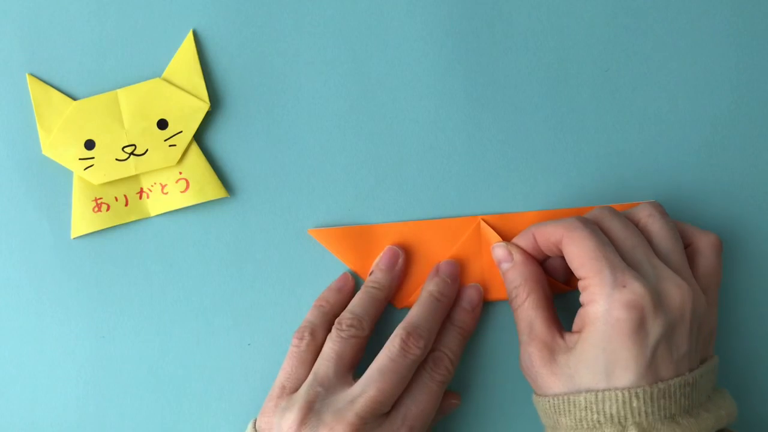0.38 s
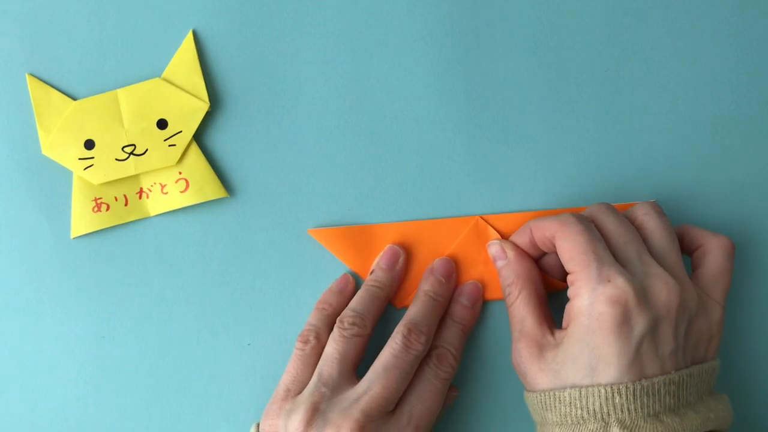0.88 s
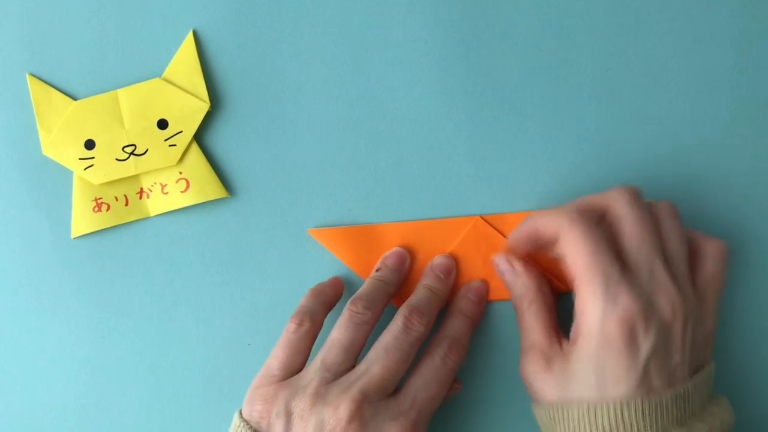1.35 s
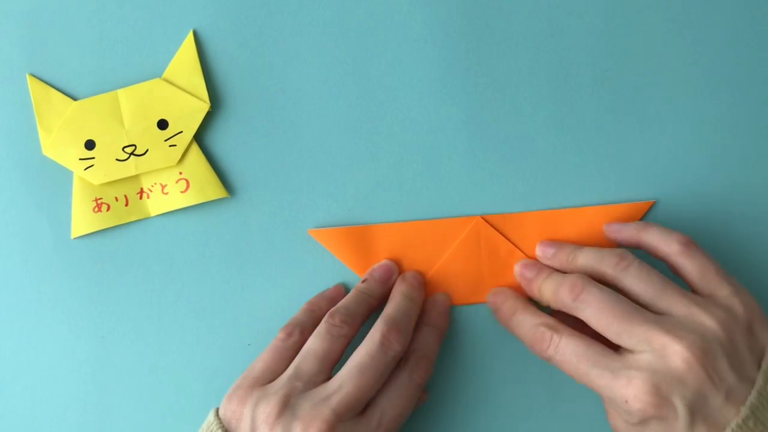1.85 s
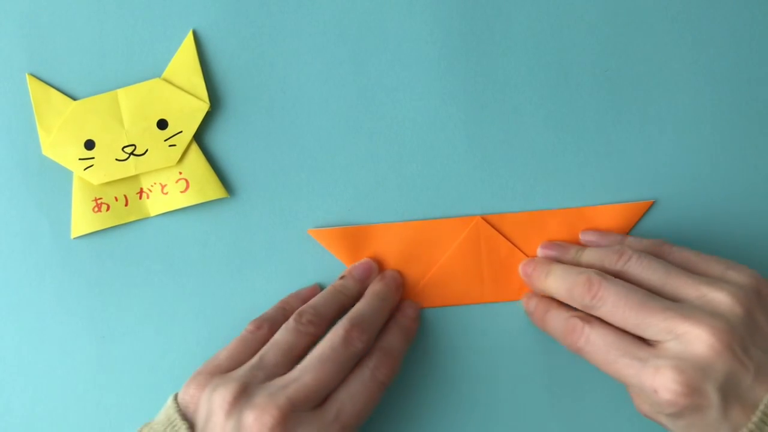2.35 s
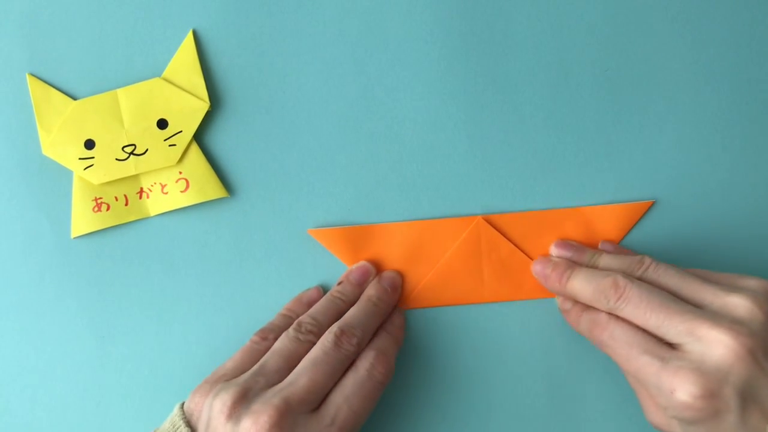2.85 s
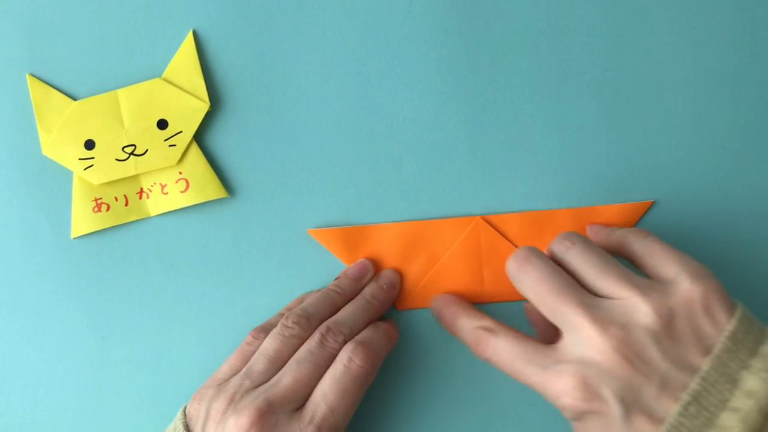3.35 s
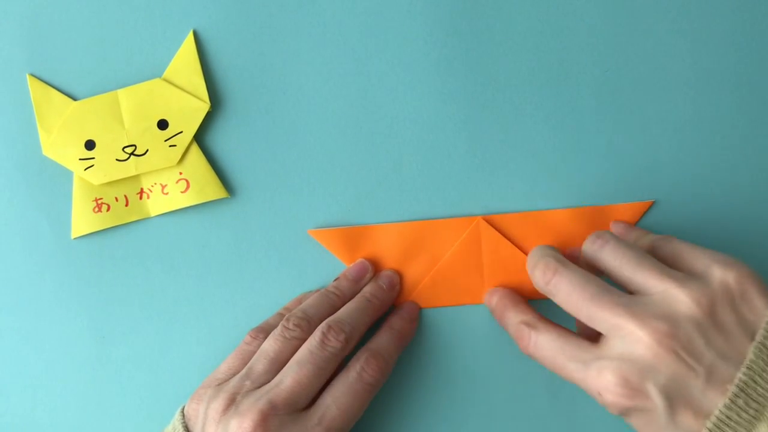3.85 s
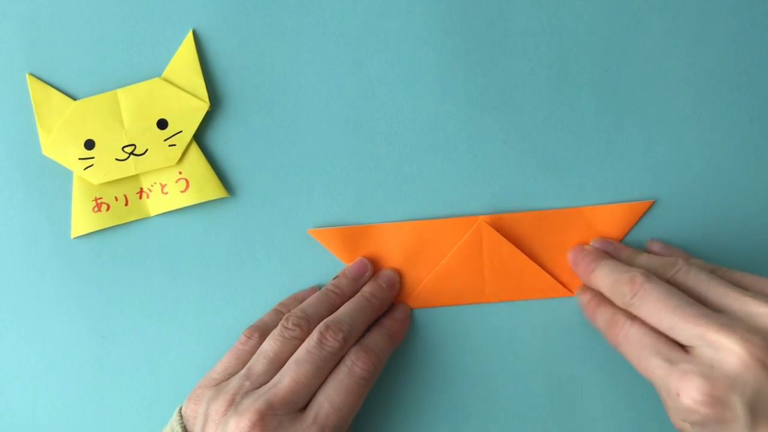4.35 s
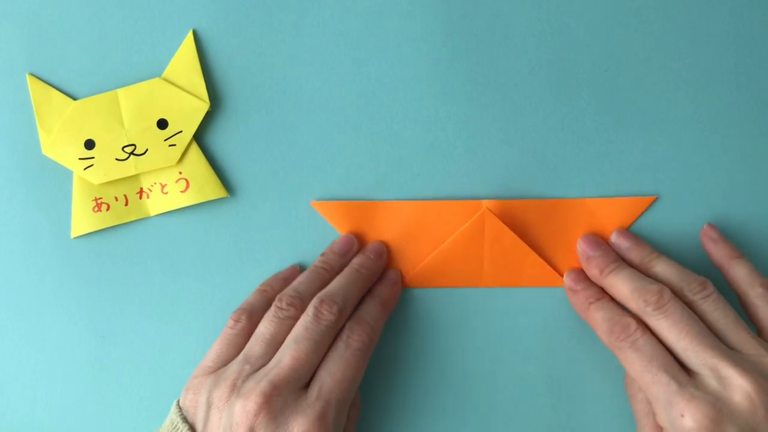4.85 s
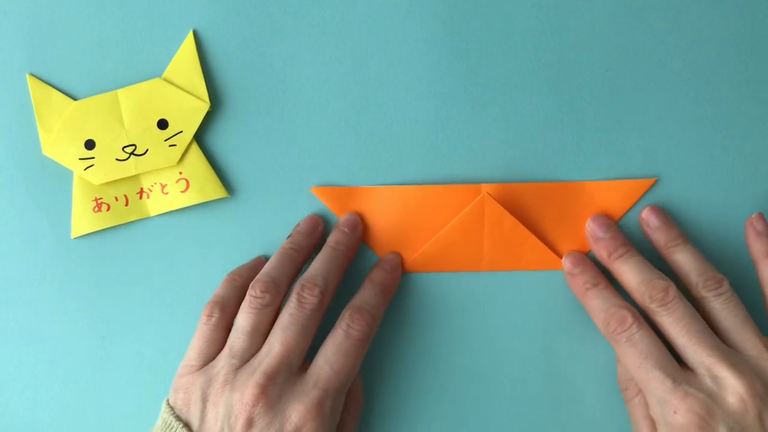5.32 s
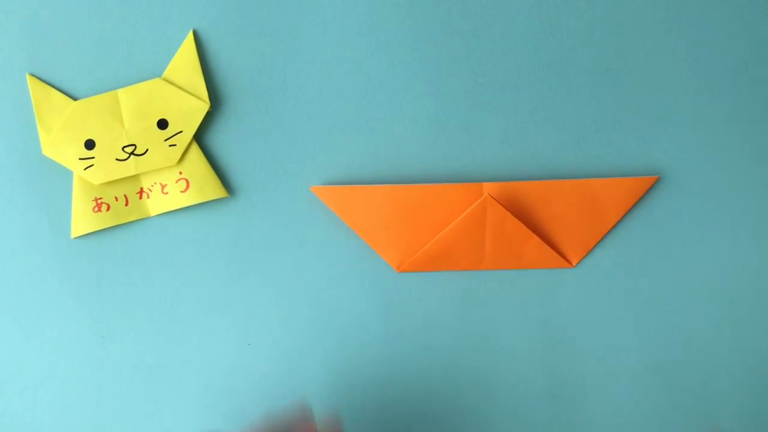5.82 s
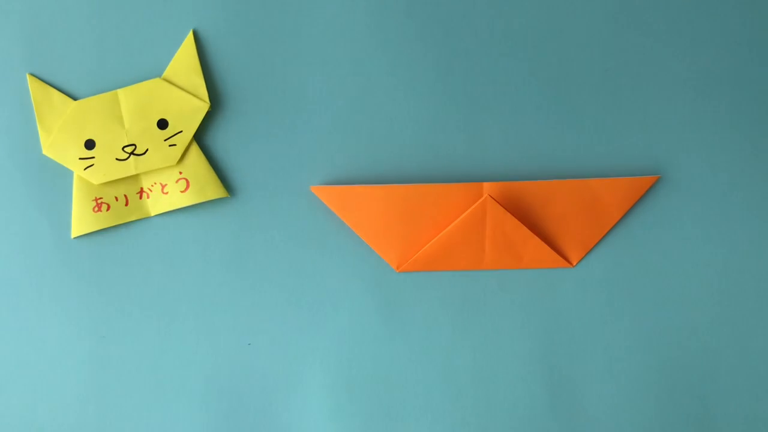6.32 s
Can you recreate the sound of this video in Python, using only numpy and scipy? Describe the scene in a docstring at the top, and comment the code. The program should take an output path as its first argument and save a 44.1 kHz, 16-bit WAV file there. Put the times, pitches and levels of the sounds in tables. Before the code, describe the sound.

A close, mono sound of hands folding a small sheet of paper on a light, slightly hollow tabletop in a quiet room with faint, low-weighted steady noise. From 0 to 0.8 s there are only soft rustles and tiny ticks. Around 0.85 to 1.2 s crisp snaps cluster, the strongest near 1.04 s, with small fingertip taps. From 1.3 to 2 s smooth hissing strokes begin, with a soft knock near 1.6 s. Between 2.2 and 3 s low rubbing and dull taps mix with small ticks; a bright snap comes at 3.04 s. A short sharp scrape sounds at 3.67 s, followed by firmer drags and hisses until 4.3 s. The loudest dry snap hits at 4.47 s. Light airy strokes continue to about 5.4 s, a small click follows at 5.6 s, then faint, nearly still room noise until about 6.7 s.

```python
"""Folding paper on a hollow tabletop

Fingers fold and crease a small sheet of paper on a light tabletop in a quiet room with a steady noise.
Skin slides over the paper by dense fine slips, a smooth hiss; drags, shifting weight and fingertip
landings excite the table's modes. Coarser slips rustle in the resonances of the folded pocket,
and sharp ticks are single snaps with a short crackle, a broad ring and a grainy scatter."""
import sys
import numpy as np
from scipy import signal
from scipy.fft import rfft, irfft
from scipy.io import wavfile
from scipy.ndimage import uniform_filter1d

SR = 44100
rng = np.random.default_rng(int(sys.argv[2]) if len(sys.argv) > 2 else 0)


def voltage_ratio(level):
    """Linear amplitude factor for a level in decibels (scalar or array-like)."""
    return 10 ** (np.asarray(level, float) / 20)


def dump(signal):
    """Clip the signal to [-1, 1] and save it as 16-bit WAV at the path in sys.argv[1]."""
    limited = np.clip(np.atleast_2d(signal).T, -1, 1)
    pcm = np.round(limited * 32767).astype(np.int16)
    wavfile.write(sys.argv[1], SR, pcm)


N = 295178   # length in samples

# Steady room noise; the last row is no property of the room but a band limit on steady sounds,
# which end steeply near 15.8 kHz. Each row: frequency in Hz, relative density in dB per Hz.
ROOM_NOISE_SPECTRUM = [(15, -45), (30, -2.5), (45, 2.5), (90, -3), (160, -9.5), (300, -15.5), (620, -18.5),
                       (1800, -24), (3300, -25.5), (8000, -28), (12300, -30), (15500, -31.5), (15900, -53)]
ROOM_DB = -65
# Modes of the tabletop. Each row: frequency in Hz, width in Hz, gain in dB.
TABLE_MODES = [(63.1, 34.6, -3.5), (125.5, 17.2, 2.5), (283, 33, -5.5), (419.3, 91, -12), (674, 101, -12),
               (1170, 242, -13.5), (1607, 63, -13.5), (1750, 160, -26)]
# Hands shifting their weight on the tabletop. Each row: time in seconds, level in dB before a slow waver.
WEIGHT_SHIFTS = [(0.0, -70), (0.165, -62.5), (0.474, -66), (0.978, -67.5), (1.217, -62), (1.5, -76),
                 (1.7, -56), (2.13, -68), (2.34, -54.5), (2.56, -59), (2.66, -68), (2.75, -58),
                 (3.233, -62.5), (3.617, -64), (3.722, -63), (4.305, -58.5), (4.739, -67.5), (5.258, -63),
                 (5.368, -80), (6.116, -69), (6.69, -67.5)]
# The sheet pressed and dragged over the tabletop.
# Each row: peak time in seconds, level in dB, rise in seconds, fall in seconds.
DRAGS = [(.25, -74.5, 1, 0.35), (1.232, -69, 0.22, 0.3), (1.7, -68, 0.25, 0.19),
         (1.816, -69.5, 0.079, 0.14), (1.99, -66.5, .18, 0.1), (2.2, -58.5, 0.016, 0.83),
         (2.39, -56, 0.22, 0.19), (2.56, -63, 0.06, .07), (2.715, -65, .03, 0.088),
         (2.84, -61.5, 0.05, 0.038), (2.94, -71, .05, 0.13), (3.17, -69.5, 0.7, 0.32),
         (3.52, -60, 0.5, 0.12), (3.69, -62, 0.027, 0.37), (3.81, -54.5, 0.12, 0.16),
         (4.17, -57.5, 0.64, 0.31), (4.39, -65.5, .25, 0.056), (4.64, -66.5, .4, 0.45),
         (4.85, -67.5, .3, 0.06), (5.288, -69.5, .12, 0.13), (6.05, -72.5, 0.18, .7)]
DRAG_REST_DB = -84.5
# Fingertips landing on the table. Each row: start in seconds, peak in dB, decay time of the push in ms.
LANDINGS = [(0.304, -58, 0.55), (0.825, -43.5, 0.62), (0.858, -43.5, 0.79), (0.928, -52.5, 0.63),
            (1.021, -49, 0.18), (1.04, -48, 0.64), (1.078, -48.5, 0.7), (1.166, -47, 0.5),
            (1.197, -53, 0.38), (1.424, -53, 0.96), (1.571, -36.5, 0.16), (1.646, -43.5, 0.93),
            (1.74, -45, 0.54), (1.96, -46, 0.87), (2.037, -43.5, 1.0), (2.19, -46, 0.34), (2.25, -43, 0.13),
            (2.51, -44.5, 0.41), (2.534, -40.5, 0.36), (2.556, -41, 0.23), (2.588, -42.5, 0.16),
            (2.695, -44.5, 0.42), (2.717, -40.5, 0.83), (2.802, -47, 0.44), (2.829, -40.5, 0.7),
            (2.92, -46, 0.67), (3.038, -42, 0.27), (3.187, -55, 0.56), (3.512, -58, 0.46),
            (4.114, -46, 0.38), (4.349, -43.5, 0.11), (4.468, -50.5, 0.43), (5.052, -52.5, 0.92),
            (5.218, -55, 0.47)]
# Finger strokes over the paper. Each row: peak time in seconds, hiss level in dB before its tilt and
# waver, rise in seconds, fall in seconds.
SLIDES = [(.06, -62.5, 0.6, 0.11), (.544, -72, 0.034, 0.029), (1.197, -72.5, .08, 0.14),
          (1.345, -60, 0.057, 0.054), (1.44, -59.5, .04, .1), (1.52, -55.5, 0.14, 0.44),
          (1.785, -58, 0.18, 0.088), (1.99, -57, 0.1, .07), (2.335, -60, 0.22, 0.21),
          (2.559, -71, 0.038, 0.053), (2.715, -72, 0.026, 0.071), (2.84, -58.5, 0.045, 0.03),
          (2.97, -96, .1, 0.041), (3.098, -63, 0.063, 0.14), (3.233, -58, 0.095, 0.05),
          (3.43, -61, 0.6, 0.21), (3.532, -55.5, 0.037, 0.03), (3.666, -43.5, 0.0047, 0.027),
          (3.79, -55, 0.15, 0.13), (3.995, -68, .03, 0.11), (4.106, -55.5, 0.12, 0.054),
          (4.205, -62.5, .2, 0.039), (4.36, -70.5, 0.038, 0.054), (4.395, -69, .05, 0.033),
          (4.5, -61.5, 0.053, 0.14), (4.62, -62, 0.12, 0.59), (4.84, -64.5, .5, 0.27),
          (5.045, -64, .03, .05), (5.085, -61, 0.036, 0.033), (5.135, -58.5, 0.02, 0.11),
          (5.255, -59, 0.071, 0.11), (5.378, -70, .07, 0.034), (5.567, -71, .04, 0.038),
          (5.662, -73, 0.04, 0.09), (5.737, -69.5, 0.044, 0.079), (6.136, -72.5, 0.26, 0.64)]
SLIDE_REST_DB = -87   # fingers resting on the sheet
# Hiss of skin on paper; the last row is no property of the skin but the same band limit on steady
# sounds. Each row: frequency in Hz, relative density in dB per Hz before the tilt.
HISS_SPECTRUM = [(900, -6), (1500, -4), (2300, -11.5), (4000, -4.5), (6000, -4.5), (9000, -4.5),
                 (12000, -6.5), (15500, -13), (15900, -38.5)]
# The hiss is duller the harder the finger bears down.
TILT_DB_PER_OCT, DULLING_PER_DB = -1.5, 0.08
# Paper layers rubbing in the fold.
# Each row: peak time in seconds, level in dB, rise in seconds, fall in seconds.
RUSTLES = [(.02, -65.5, 0.12, 0.18), (.215, -62, 0.038, 0.016), (.285, -57.5, 0.048, 0.028),
           (.424, -59, 0.021, 0.018), (.539, -62, 0.069, 0.086), (.644, -67.5, 0.022, 0.014),
           (.698, -67.5, 0.019, 0.013), (.828, -67, .03, 0.018), (1.197, -54.5, 0.017, 0.023),
           (1.25, -61, 0.092, 0.18), (1.457, -52.5, 0.027, 0.0085), (1.535, -70, 0.043, 0.63),
           (1.72, -66, 0.16, 0.18), (1.805, -66, 0.082, 0.05), (1.985, -84, .3, 0.17),
           (2.38, -89, 0.18, 0.22), (2.559, -66, 0.056, 0.037), (2.734, -81, 0.054, 0.049),
           (2.855, -67, .07, 0.029), (2.945, -69, 0.034, 0.041), (3.1, -74, 0.062, .5),
           (3.45, -65.5, 0.18, 0.17), (3.76, -57.5, 0.1, 0.093), (4.11, -59.5, 0.12, .1),
           (4.21, -61.5, .15, .035), (4.305, -65, 0.049, .033), (4.39, -65.5, 0.046, .03),
           (4.53, -72, .09, 1.7), (5.083, -66, 0.1, 0.055), (5.26, -64.5, 0.082, 0.14),
           (5.37, -71, 0.13, 0.047), (6.126, -78, 0.12, 0.17)]
RUSTLE_REST_DB = -101.5
# Air and paper of the folded pocket. Each row: frequency in Hz, width in Hz, gain in dB.
POCKET_MODES = [(1180, 150, -11), (1670, 140, 0), (2290, 170, 1), (2850, 250, -9), (3700, 400, -12)]
# Paper ticks. Each row: time in seconds, peak in dB before the scatter is added, ring frequency in Hz,
# early treble rms in dB relative to the ring's peak, crackle in dB relative to the snap.
TICKS = [(0.19, -40, 1640, -9, -23), (0.2563, -48, 2230, -20, -19), (0.303, -47, 2260, -16, -16),
         (0.4134, -57, 2300, -16, -4), (0.466, -48, 1600, -17, -16), (0.5474, -48, 4970, -14, -13.5),
         (0.6935, -52.5, 2360, -11, -20), (0.8125, -39.5, 2400, -34, -35), (0.8586, -19.5, 5840, -53, -26),
         (0.881, -47, 3000, -29, -27), (1.0212, -35, 2410, -18, -15), (1.0368, -14, 2800, -28, -27),
         (1.0798, -31, 1750, -8, -15.5), (1.1352, -31, 3370, -1, -13), (1.164, -35, 2200, -13.5, -13),
         (1.1942, -47, 2260, -15, -9), (1.3256, -35.5, 3670, -17, -13.5), (1.4282, -40.5, 1630, -8, -23),
         (1.5701, -24, 4660, -22, -11), (1.6436, -37, 1750, -17.5, -19.5), (1.798, -33.5, 1490, -16, -20),
         (2.192, -40.5, 1160, -13, -19), (2.2458, -40.5, 1170, -15, -13.5),
         (2.292, -36, 3600, -14.5, -15.5), (2.4325, -22.5, 2800, -6, -22), (2.468, -47.5, 883, -14, -16),
         (2.5121, -43.5, 1060, -16, -15), (2.5316, -32.5, 1230, -18.5, -16), (2.558, -47, 1160, -8, -17),
         (2.589, -30.5, 1590, -15.5, -22), (2.696, -41, 1180, -15, -3), (2.719, -54, 1170, -24, -2),
         (2.8017, -42.5, 1170, -20, -19), (2.8293, -31, 1750, -15.5, -20), (2.9176, -37.5, 1750, -10.5, -4),
         (2.9873, -43, 1350, -32, -24), (3.039, -15, 2560, -2, -9), (3.1885, -41.5, 5140, -1, -12),
         (3.3029, -42.5, 980, -25, -25), (3.5209, -38.5, 1690, 1, -17), (3.6651, -29, 3650, -12, -4),
         (3.932, -23, 7100, -43, -16), (3.9863, -45, 965, -15, -14), (4.1905, -42.5, 1760, -20, -1),
         (4.2204, -45, 1770, -20, -19), (4.3192, -38.5, 1160, -21, -18.5), (4.3498, -38, 1180, -19, -21.5),
         (4.4546, -24.5, 3940, -9, -30), (4.4687, -3.5, 3150, -18.5, -21), (5.1218, -49, 4330, -8, -21),
         (5.1544, -48.5, 1660, -25, -3), (5.1913, -35, 835, -15, -19), (5.217, -40.5, 2200, -20, -22),
         (5.3574, -50.5, 1470, -18, -26), (5.5907, -30.5, 4890, -28, -17), (6.123, -48, 6000, -13, -19.5)]
# Scatter gain relative to the tick's peak; a drier tick leaves less.
TICK_TAIL_DB, TAIL_PER_CRACKLE_DB = -11, 0.27
# Rise and fall of a stroke are the times to lose 20 dB, 5 ms at least.
STROKE_ROUNDNESS = 1.22   # 1 pointed, 2 bell-shaped
# Dips where a reflection off the tabletop cancels the direct sound.
# Each row: frequency in Hz, width in Hz, depth from 0 to 1.
REFLECTION_DIPS = [(4890, 900, 0.4), (7730, 1480, 0.39), (10450, 1700, 0.44)]
CUTOFF_HZ = 17000   # attenuation reaches 60 dB here


def rms_one(x):
    """Normalisation: a signal divided by its root mean square has unit rms."""
    return x / np.sqrt(np.mean(x ** 2) + 1e-20)


def in_time(rows):
    """Linear interpolation: the columns of a curve table at every sample."""
    s, *columns = np.transpose(rows)
    return [np.interp(np.arange(N) / SR, s, c) for c in columns]


def strokes_db(rows, rest_db):
    """Incoherent addition: the powers of overlapping strokes add to a resting power; level in dB."""
    t = np.arange(0, N + 44, 44) / SR
    power = voltage_ratio(2 * rest_db)
    for s, peak_db, rise, fall in rows:
        away = np.where(t < s, (s - t) / max(rise, .005), (t - s) / max(fall, .005))
        loss_db = 20 * np.minimum(away, 9) ** STROKE_ROUNDNESS
        power = power + voltage_ratio(2 * (peak_db - loss_db))
    return np.interp(np.arange(N) / SR, t, 10 * np.log10(power))


def coloured(x, spectrum):
    """Spectral shaping: a steady noise is weighted by a (Hz, dB per Hz) spectrum; rms 1."""
    hz, level_db = np.transpose(spectrum)
    bins = np.maximum(np.arange(N // 2 + 1) * SR / N, 1)
    gain = voltage_ratio(np.interp(np.log(bins), np.log(hz), level_db))
    return rms_one(irfft(rfft(x) * gain, N))


def band(x, low_hz, high_hz):
    """Band-pass filtering by a Butterworth design of order 2."""
    edges = [low_hz, min(high_hz, SR / 2.3)]
    return signal.sosfilt(signal.butter(2, edges, "band", fs=SR, output="sos"), x)


def resonance(x, hz, width):
    """Damped oscillator: a pole pair whose radius sets the width in Hz, with gain 1 on top."""
    r = np.exp(-np.pi * width / SR)
    feed = np.array([1, 0, -1]) * (1 - r * r) / 2
    return signal.lfilter(feed, [1, -2 * r * np.cos(2 * np.pi * hz / SR), r * r], x)


def modes(x, table):
    """Modal superposition: parallel resonances with alternating signs."""
    out = 0
    for k, (hz, width, level_db) in enumerate(table):
        out = out + (-1) ** k * voltage_ratio(level_db) * resonance(x, hz, width)
    return out


def drift(rate_hz):
    """Low-passed chance: noise through two equal poles wanders slowly, spread 1."""
    r = np.exp(-2 * np.pi * rate_hz / SR)
    wander = signal.lfilter([1], [1, -2 * r, r * r], rng.standard_normal(N + SR))
    return rms_one(wander[SR:])   # the first second settles


def slips(per_s, spread_db, clump_db):
    """Stick-slip friction: clicks of uneven size and either sign come in clumps; rms 1."""
    sizes = voltage_ratio(spread_db * np.minimum(rng.exponential(1, N), 5)) * rng.choice([-1, 1], N)
    chance = per_s * voltage_ratio(clump_db * drift(20.0)) / SR
    return rms_one(sizes * (rng.random(N) < chance) + 1e-18)


def room_noise():
    """Stationary background: Gaussian noise is shaped to a fixed, band-limited spectrum."""
    return voltage_ratio(ROOM_DB) * coloured(rng.standard_normal(N), ROOM_NOISE_SPECTRUM)


def table_rub():
    """Friction-driven modes: drag shakes the upper table modes, shifting weight the lowest ones."""
    drag_slips = slips(2500.0, spread_db=3.5, clump_db=2.5)
    drag = rms_one(band(modes(drag_slips, TABLE_MODES), 263, 3570))
    weight_slips = slips(330.0, spread_db=-2.5, clump_db=4.5)
    weight = rms_one(band(modes(weight_slips, TABLE_MODES), 26.36, 210))
    weight_db = in_time(WEIGHT_SHIFTS)[0] + 1.4 * drift(4.0)
    return voltage_ratio(strokes_db(DRAGS, DRAG_REST_DB)) * drag + voltage_ratio(weight_db) * weight


def thumps():
    """Impact excitation: a push, longer for a soft fingertip, sets the table modes ringing."""
    out = np.zeros(N + 9000)
    t = np.arange(9000) / SR
    skids = rng.standard_normal((len(LANDINGS), len(t))) * np.exp(-t / 0.014)
    for (s, peak_db, push_ms), skid in zip(LANDINGS, skids):
        push = np.exp(-1000 * t / np.clip(push_ms, .05, 6))
        knock = modes(push, TABLE_MODES)
        # the skin skids briefly
        knock = knock + voltage_ratio(-8.5) * band(modes(skid, TABLE_MODES), 370, 2200)
        at = round(s * SR)
        out[at:at + len(t)] += voltage_ratio(peak_db) * knock / np.abs(knock).max()
    return out[:N]


def skin_hiss():
    """Dense stick-slip of skin on paper: half octaves tilt with pressure and waver, partly together."""
    hiss_db = strokes_db(SLIDES, SLIDE_REST_DB)
    bearing_db = strokes_db(DRAGS, DRAG_REST_DB) - hiss_db   # pressure relative to the hiss
    tilt_db = np.clip(TILT_DB_PER_OCT - DULLING_PER_DB * bearing_db, -6, 4)
    hiss = coloured(slips(12000.0, spread_db=2.5, clump_db=2.2), HISS_SPECTRUM)
    edges = 1400 * 2 ** np.arange(0, 4.1, .5)   # Hz
    together = drift(56.0)
    out = 0
    for k, (low, high) in enumerate(zip(edges, edges[1:])):
        waver_db = .7 * together + .9 * drift(14.0)
        gain = voltage_ratio(tilt_db * np.log2(low / 6000) + waver_db)
        out = out + (-1) ** k * band(hiss, low, high) * gain
    return voltage_ratio(hiss_db) * out


def pocket_rustle():
    """Cavity and sheet resonance: coarser slips between the paper layers ring in the pocket."""
    layer_slips = slips(1800.0, spread_db=4.0, clump_db=1.5)
    return voltage_ratio(strokes_db(RUSTLES, RUSTLE_REST_DB)) * rms_one(modes(layer_slips, POCKET_MODES))


def tick_burst(t, noise, hz, treble_db, crackle_db):
    """Impulse response: a snap and a short crackle ring broadly at the flap's pitch; peak 1."""
    crack = voltage_ratio(crackle_db) * noise * np.exp(-(t / 0.0028) ** 2)   # holds, then stops
    crack[0] = 1   # the snap itself
    ring = band(resonance(crack, hz, .5 * hz), .5 * hz, 4.06 * hz)
    ring = ring + 0.45 * band(crack, 1500, 5000) + 0.097 * modes(crack, POCKET_MODES)
    treble = band(crack * np.exp(-t / 0.0037), 3600, 12100)   # the treble dies first
    treble = treble / np.sqrt(np.mean(treble[t < .004] ** 2))
    tick = ring / np.abs(ring).max() + voltage_ratio(treble_db) * treble
    return tick / np.abs(tick).max()


def tick_scatter(t, noise, grain, hz):
    """Diffuse reflection: a duller, grainy decay from near surfaces, then from the room."""
    flicker_db = 3 * np.sqrt(40) * uniform_filter1d(grain, size=40)
    decay = np.exp(-t / 0.0032) + voltage_ratio(-13.5) * np.exp(-t / 0.018)   # near surfaces, then the room
    scatter = noise * voltage_ratio(flicker_db) * decay
    tail = 0.99 * resonance(scatter, min(hz, 3800), .6 * hz)
    tail = tail + 0.82 * band(scatter, 1300, 5300) + 0.4 * modes(scatter, POCKET_MODES)
    return tail + 0.051 * band(noise * np.exp(-t / 0.011), 5000, 10000)


def ticks():
    """Superposition of transients: every tick of the paper adds its burst and its scatter."""
    out = np.zeros(N + 4000)
    t = np.arange(4000) / SR
    noise = rng.standard_normal((len(TICKS), 3, len(t)))
    for (s, peak_db, hz, treble_db, crackle_db), (near, far, grain) in zip(TICKS, noise):
        tick = tick_burst(t, near, hz, treble_db, crackle_db)
        tail_db = TICK_TAIL_DB + TAIL_PER_CRACKLE_DB * crackle_db
        tail = voltage_ratio(tail_db) * tick_scatter(t, far, grain, hz)
        at = round((s + .0008) * SR)   # starts 0.8 ms after the listed time
        out[at:at + len(t)] += voltage_ratio(peak_db) * (tick + tail)
    return out[:N]


def scene():
    """Linear superposition: hands, paper and table over the room's steady noise."""
    table = table_rub() + thumps()
    paper = skin_hiss() + pocket_rustle() + ticks()
    return (room_noise() + table + paper)[None]


def top_cut(x):
    """Nothing passes above the cut-off."""
    return signal.sosfilt(signal.butter(12, 16810, fs=SR, output="sos"), x)


def record(dry):
    """Interference: the tabletop's reflection leaves three shallow dips; then the top is cut."""
    for hz, width, depth in REFLECTION_DIPS:
        dry = dry - depth * resonance(dry, hz, width)
    cut = signal.sosfilt(signal.cheby2(12, 60, CUTOFF_HZ, fs=SR, output="sos"), dry)
    return top_cut(cut)


dry = scene()
out = record(dry)
dump(out)
```